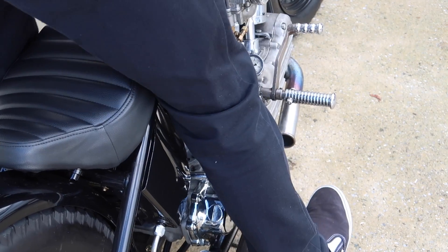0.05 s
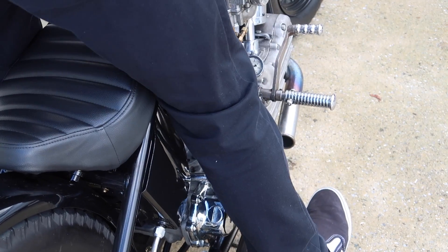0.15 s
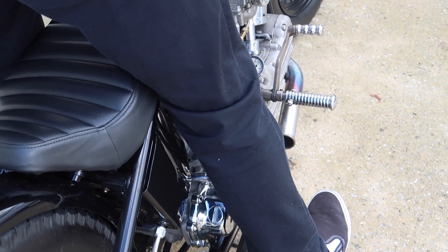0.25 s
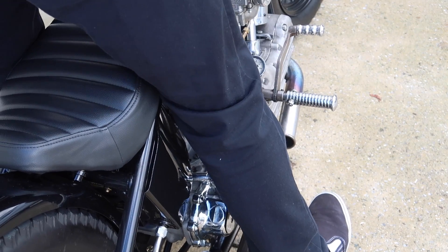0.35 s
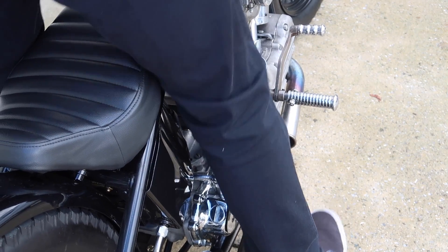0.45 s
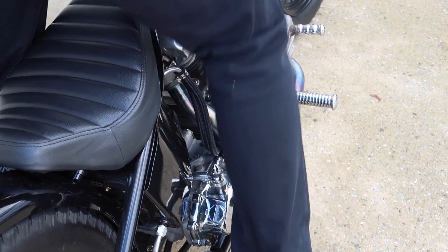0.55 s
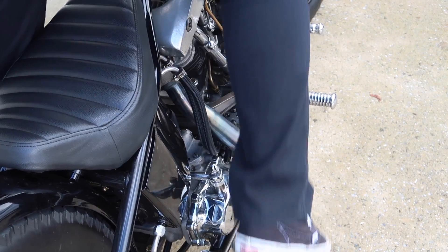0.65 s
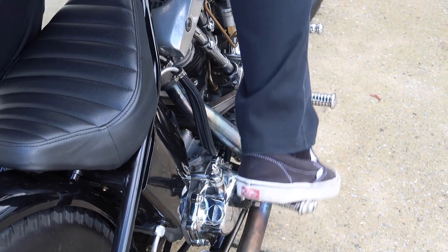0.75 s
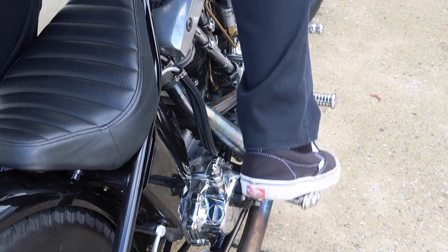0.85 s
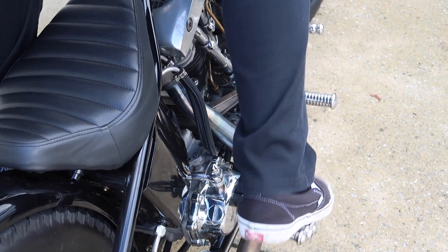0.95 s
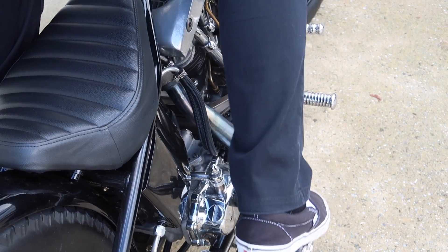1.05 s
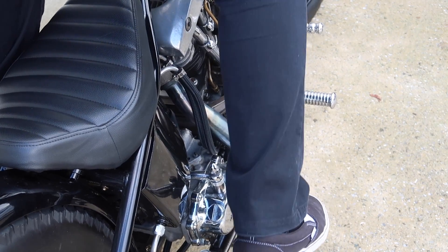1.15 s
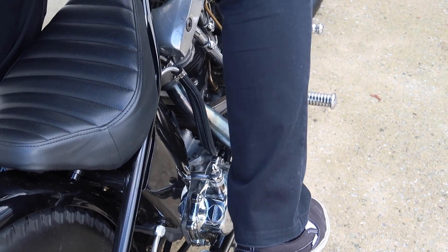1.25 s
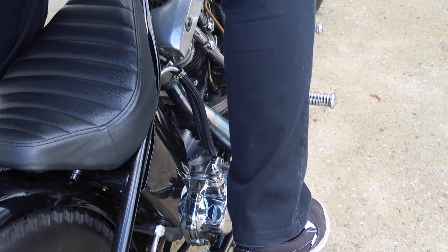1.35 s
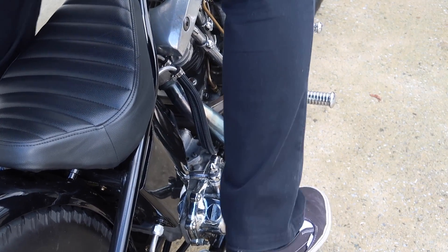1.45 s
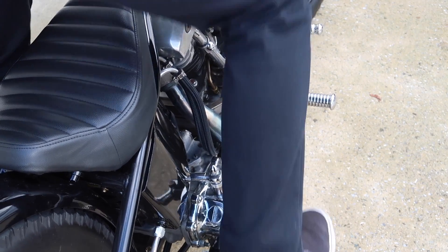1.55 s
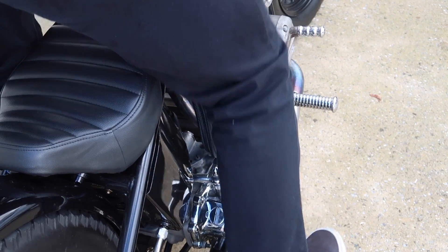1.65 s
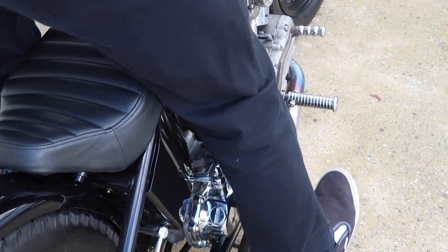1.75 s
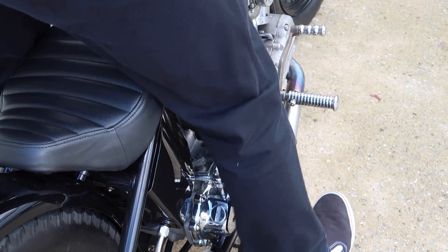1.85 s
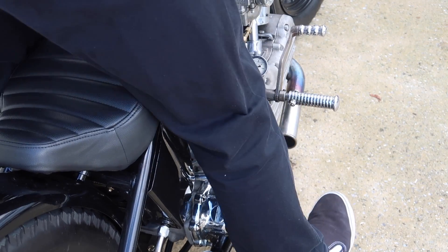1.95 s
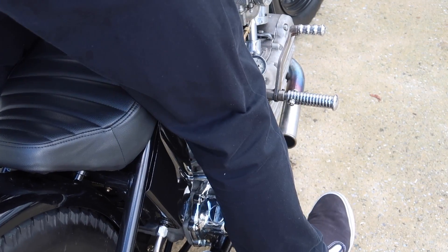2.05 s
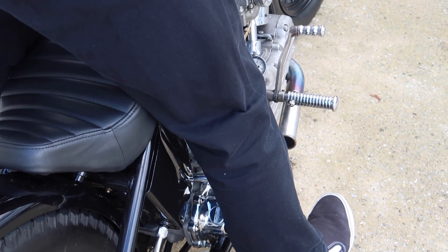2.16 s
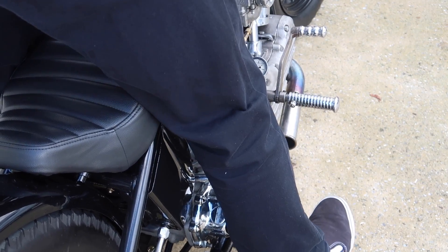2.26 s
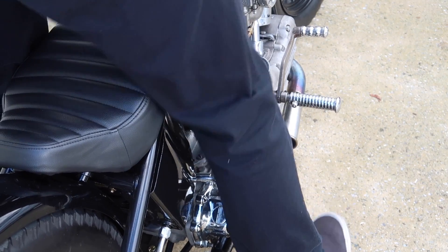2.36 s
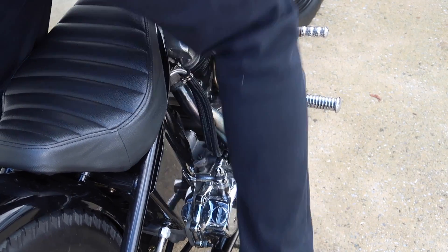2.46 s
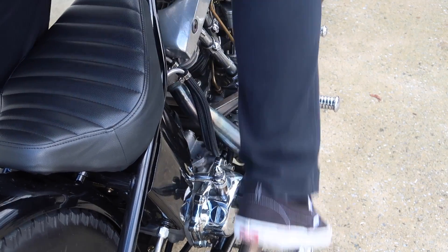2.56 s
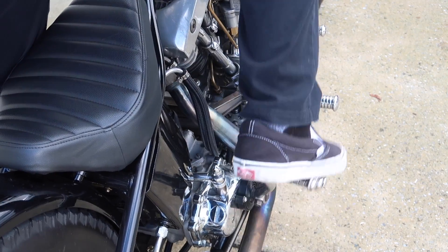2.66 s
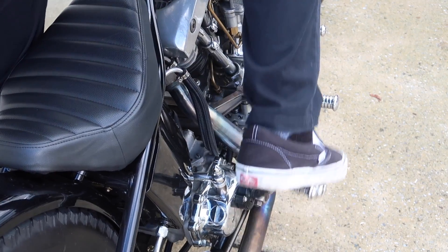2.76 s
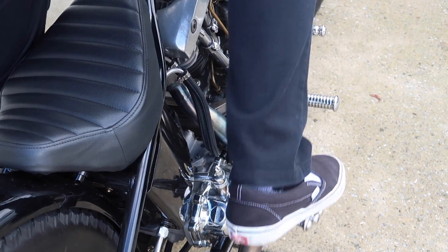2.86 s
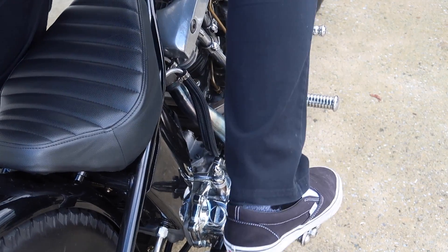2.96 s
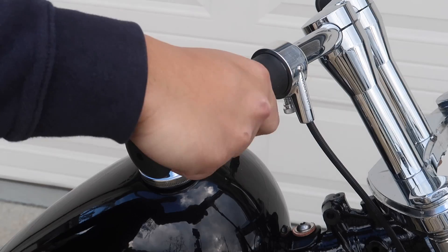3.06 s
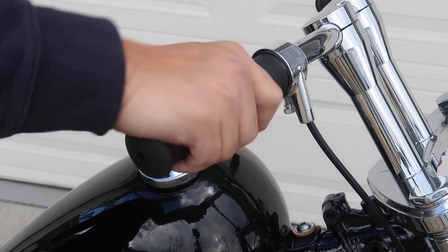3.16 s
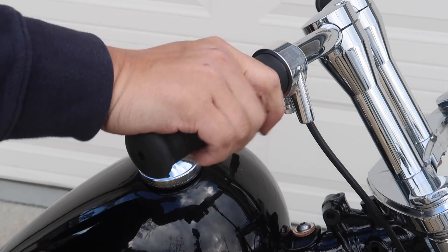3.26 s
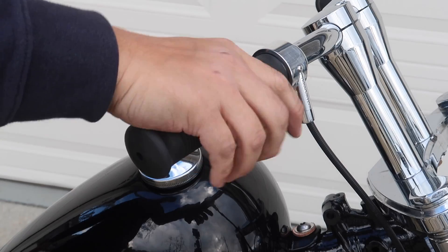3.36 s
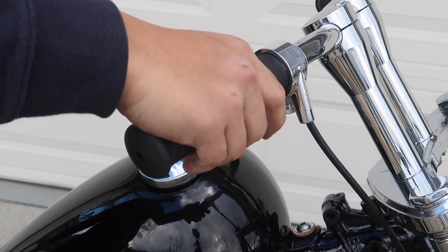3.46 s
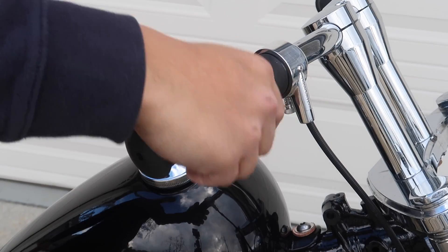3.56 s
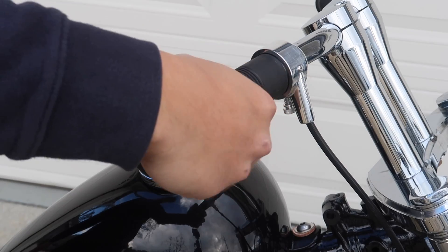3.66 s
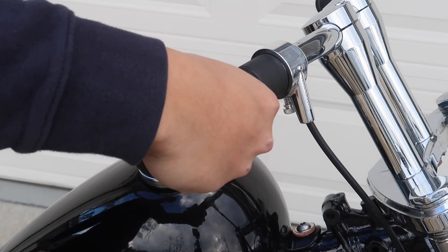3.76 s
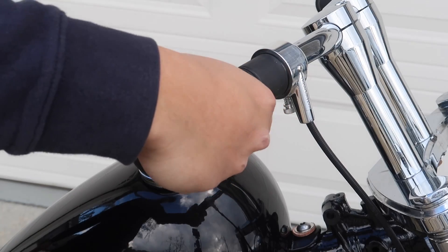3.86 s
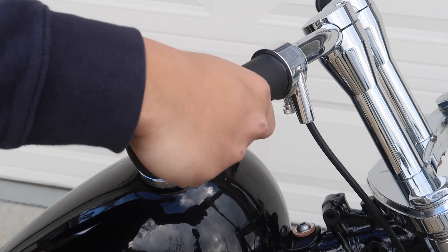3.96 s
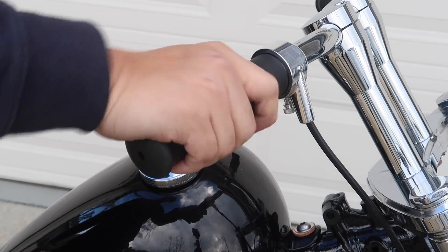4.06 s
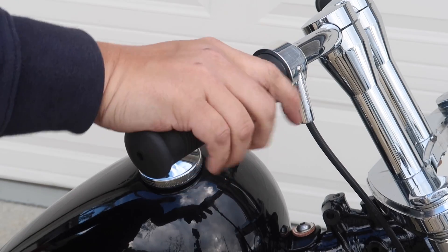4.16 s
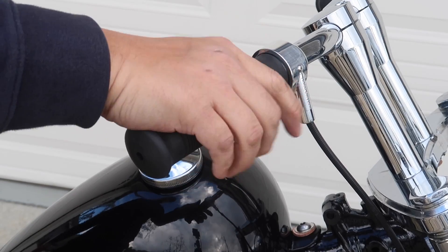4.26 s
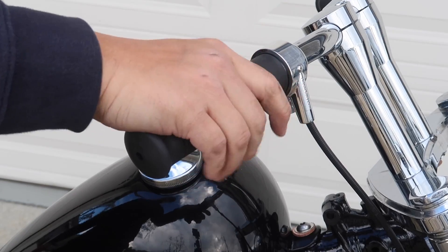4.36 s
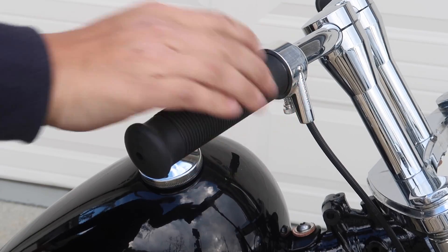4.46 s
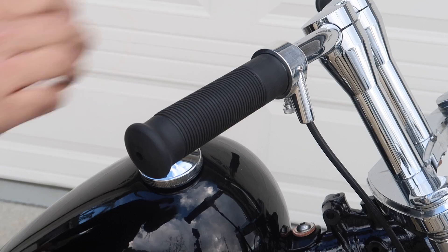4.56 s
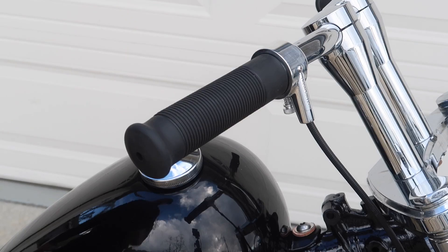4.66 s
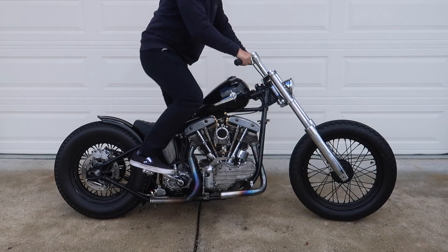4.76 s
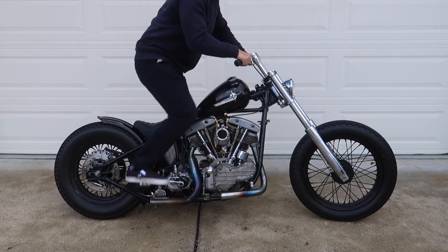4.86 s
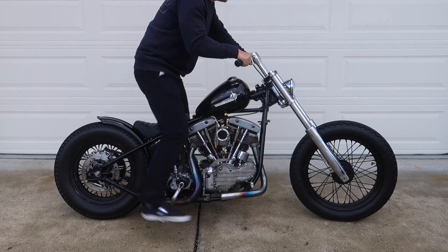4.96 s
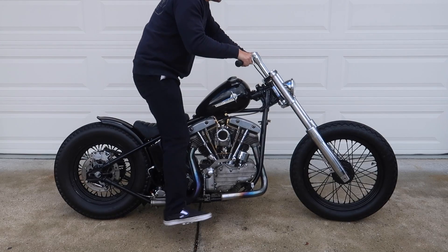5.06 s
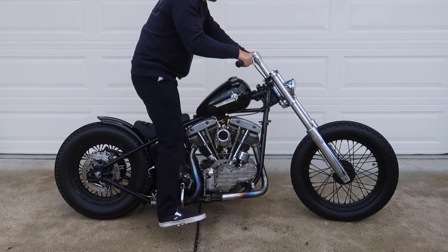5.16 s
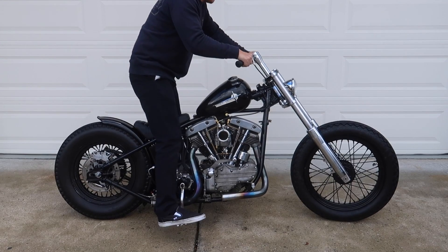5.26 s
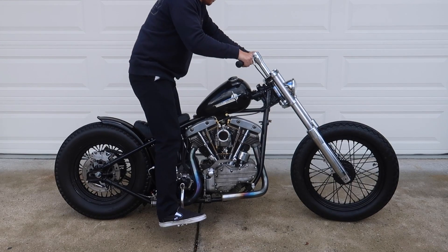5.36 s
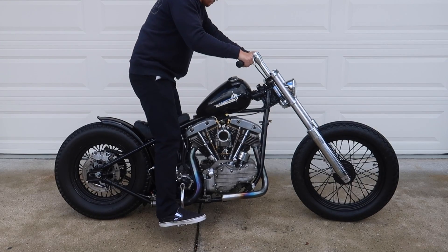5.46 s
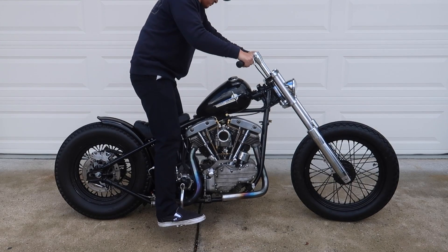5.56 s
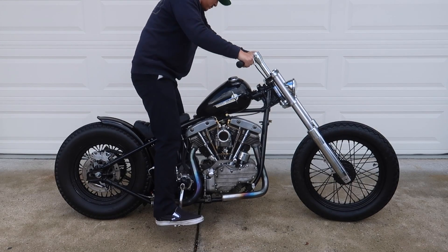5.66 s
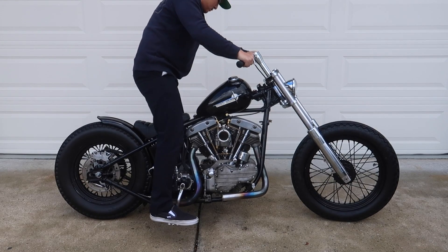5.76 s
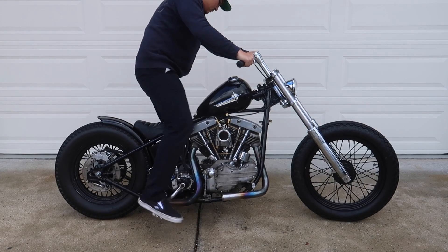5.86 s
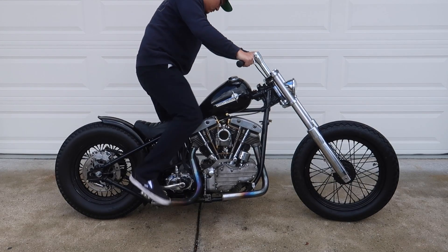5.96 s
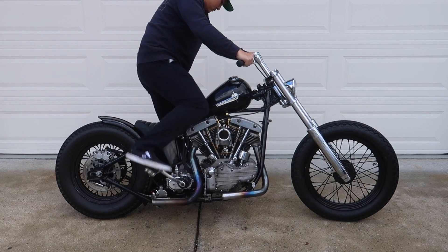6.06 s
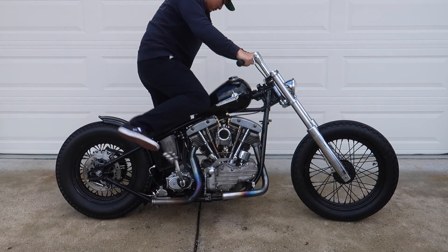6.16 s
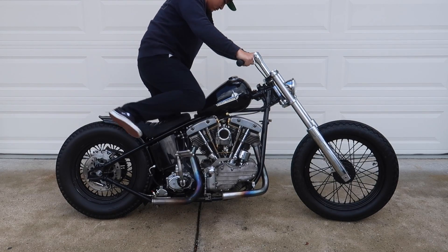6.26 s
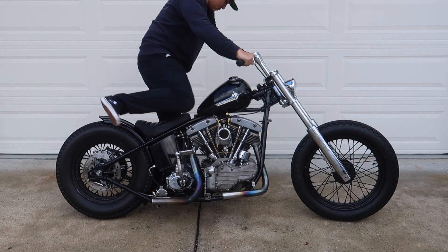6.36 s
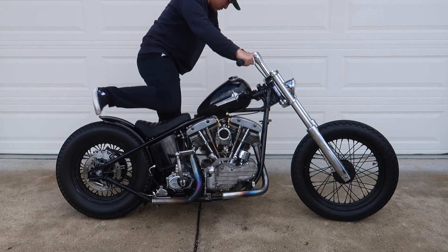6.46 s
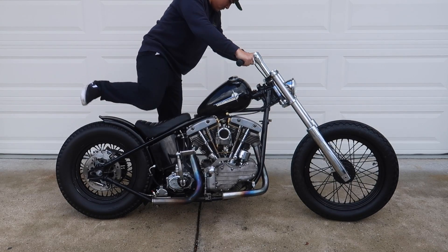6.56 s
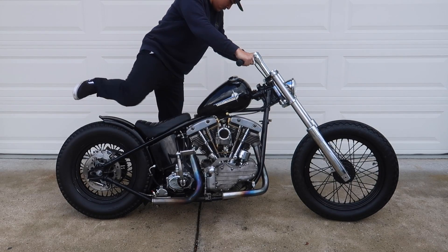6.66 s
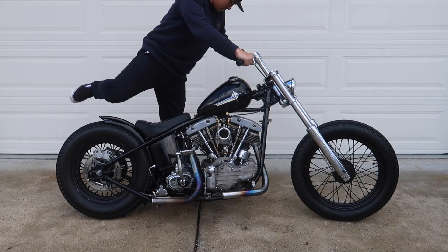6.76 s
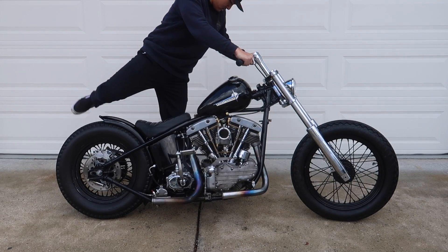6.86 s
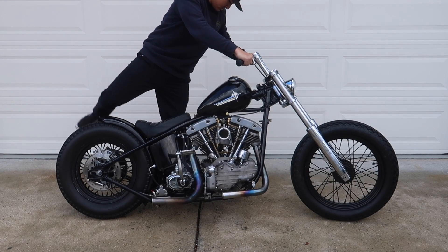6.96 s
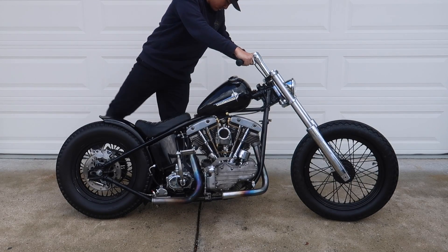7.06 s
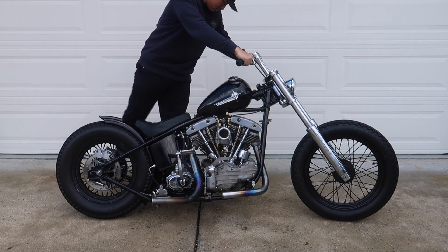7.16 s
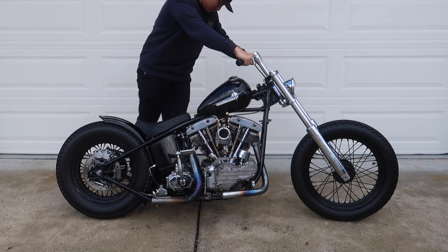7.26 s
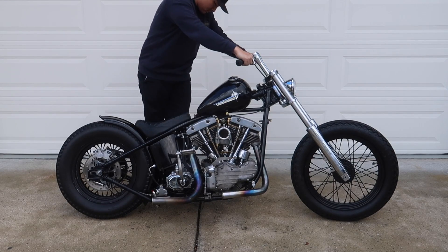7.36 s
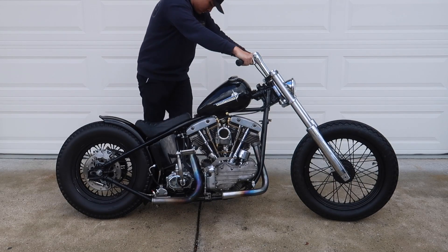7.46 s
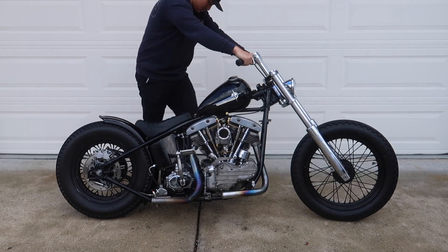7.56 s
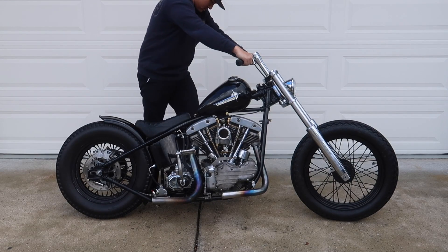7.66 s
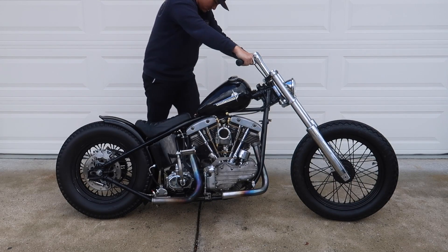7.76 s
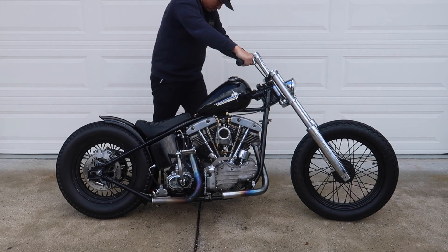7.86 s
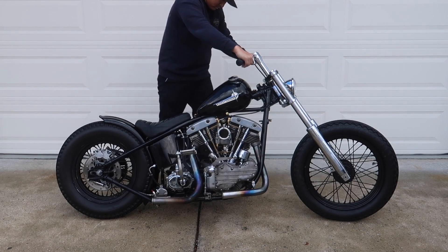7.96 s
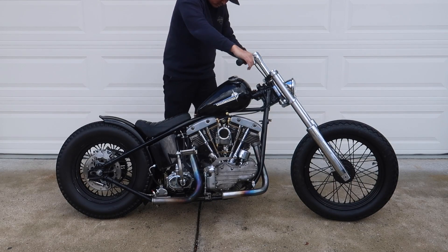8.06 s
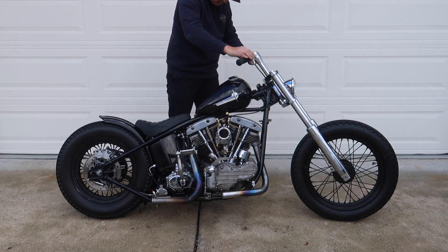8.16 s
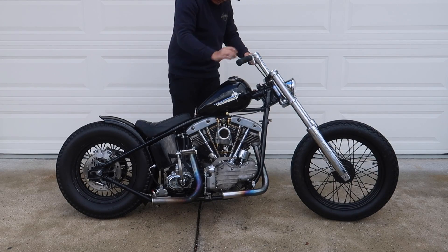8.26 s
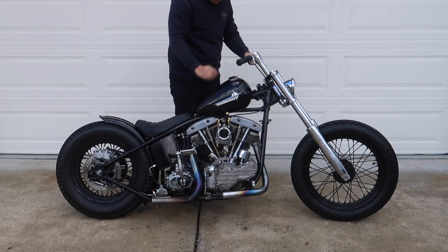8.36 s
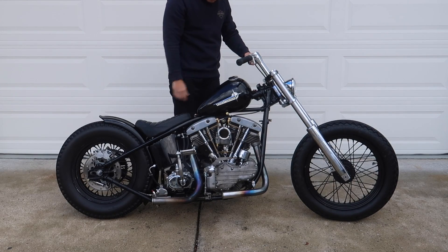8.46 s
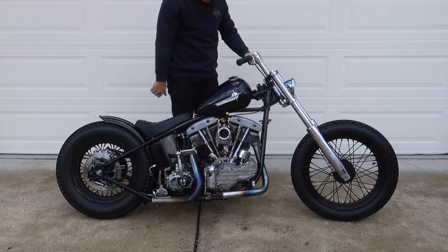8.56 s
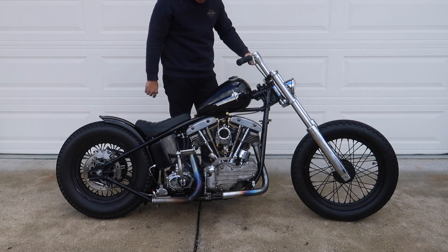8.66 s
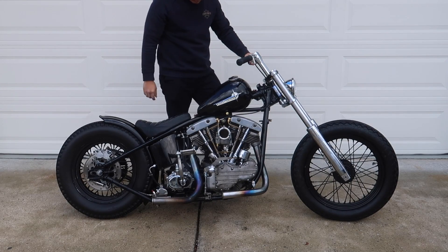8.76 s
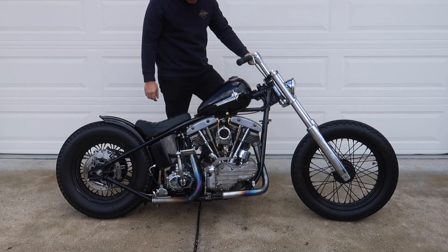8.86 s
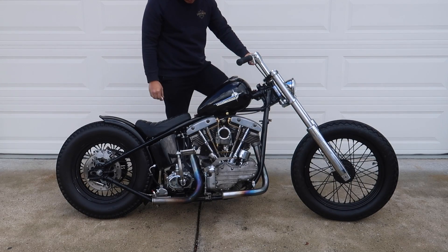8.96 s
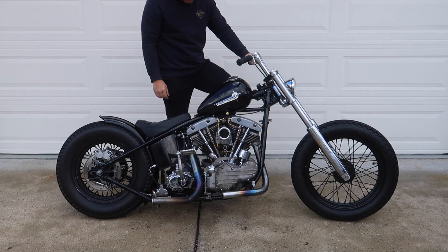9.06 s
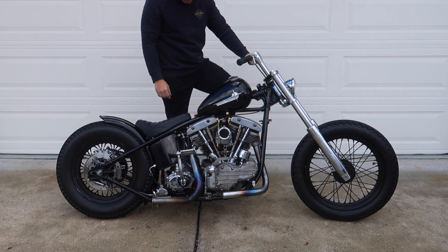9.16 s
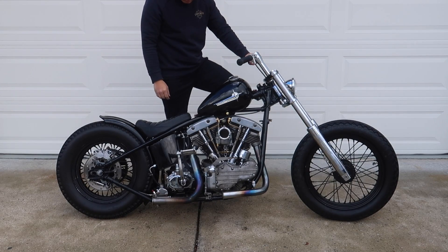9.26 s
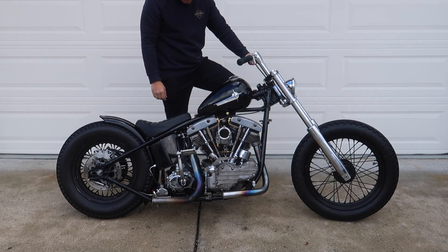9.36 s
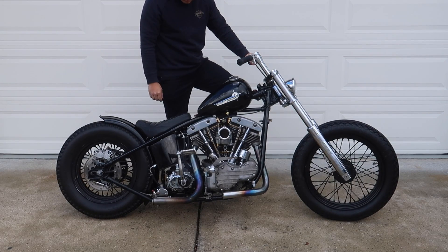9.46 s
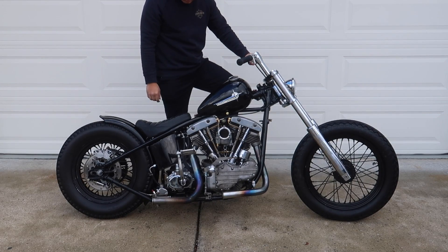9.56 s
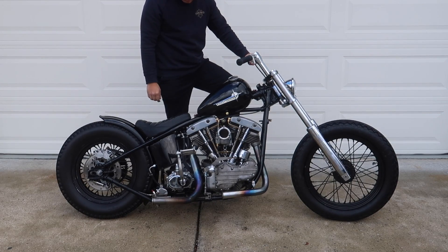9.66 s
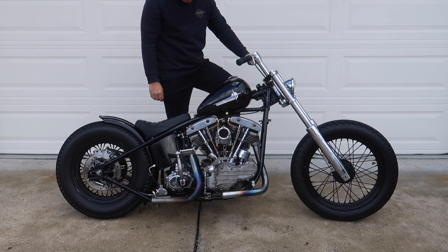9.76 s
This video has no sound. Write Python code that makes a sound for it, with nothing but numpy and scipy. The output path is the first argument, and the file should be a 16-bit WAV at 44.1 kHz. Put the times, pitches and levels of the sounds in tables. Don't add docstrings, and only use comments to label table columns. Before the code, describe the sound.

Kick lever of a motorcycle ratchets twice close up, a hand grip snaps twice, then a third kick catches into an uneven two-cylinder idle.

```python
import sys
import numpy as np
from scipy import signal
from scipy.fft import rfft, irfft, next_fast_len
from scipy.io import wavfile
from scipy.ndimage import uniform_filter1d

SR = 44100
rng = np.random.default_rng(int(sys.argv[2]) if len(sys.argv) > 2 else 0)


def store_wav(level_fs):
    pcm = np.round(np.clip(np.atleast_2d(level_fs), -1, 1) * 32767)
    wavfile.write(sys.argv[1], SR, pcm.T.astype(np.int16))


def how_loud(loudness_db):
    steps = np.asarray(loudness_db, float) / 20
    return 10 ** steps


N = 433062
T = np.arange(N) / SR
QUIET = int(5.5 * SR)

# f/Hz, level/dB
BASS_HALF = [(1200, 0), (3000, -30)]
TREBLE_HALF = [(700, -30), (2200, 0)]
# f/Hz, width/Hz, level/dB
LEVER_MODES = [(560, 50, -8), (870, 25, 1), (1010, 40, -5), (1112, 13, 6), (1720, 40, -8), (2020, 25, -4),
               (2290, 35, -4), (2650, 40, -4), (3150, 30, -2), (4030, 80, -11), (4390, 30, -6),
               (5140, 40, -12)]
# f/Hz, width/Hz, level/dB
GEAR_MODES = [(732, 29, 0), (856, 20, -1), (1110, 21, -4), (1320, 33, -7), (1480, 32, -8), (2420, 120, -15),
              (3790, 62, -13), (4910, 61, -13), (5650, 52, -18), (6420, 41, -20), (7200, 60, -22),
              (8300, 70, -25)]
# f/Hz, width/Hz, level/dB
SPRING_MODES = [(1660, 46, -2), (2480, 43, 0), (3080, 180, -3), (3860, 83, -2), (4470, 35, 2),
                (4720, 40, -3)]


def noise():
    return rng.standard_normal(N)


def level(x, db):
    return x * how_loud(db) / np.sqrt(np.mean(x ** 2))


def colour(x, table):
    size = next_fast_len(len(x), True)
    hz, db = np.transpose(table)
    bins = np.arange(size // 2 + 1) * SR / size
    gain = how_loud(np.interp(np.log(bins + 1), np.log(hz), db))
    return irfft(rfft(x, size) * gain, size)[:len(x)]


def ring(x, modes):
    out = 0
    for hz, width, db in modes:
        out = out + how_loud(db) * signal.lfilter(*signal.iirpeak(hz, hz / width, SR), x)
    return out


def curve(spans, column):
    out = np.zeros(N)
    for rows in spans:
        rows = np.array(rows)
        inside = (T >= rows[0, 0]) & (T <= rows[-1, 0])
        out[inside] = how_loud(np.interp(T[inside], rows[:, 0], rows[:, column]))
    return uniform_filter1d(out, size=180)


def swells(rows):
    out = 0
    for s, db, rise, hold, fall in rows:
        ramp = np.minimum((T - s) / rise, (s + hold - T) / fall)
        out = out + how_loud(db + 20 * np.minimum(0, ramp))
    return out


def strike(times, dbs, shape, speeds=None):
    out = np.zeros(N + len(shape))
    k = np.arange(len(shape))
    if speeds is None:
        speeds = np.ones(len(times))
    for s, db, speed in zip(times, dbs, speeds):
        i = int(s * SR)
        out[i:i + len(shape)] += how_loud(db) * np.interp(k * speed, k, shape)
    return out[:N]


def fades(times, dbs, t60s):
    out = np.zeros(N)
    for s, db, t60 in zip(times, dbs, t60s):
        i = int(s * SR)
        out[i:i + SR // 2] += how_loud(db - 60 * T[:SR // 2] / max(t60, 1 / 300))
    return out


def walk(rate):
    held = rng.standard_normal(size=8000)[(T * min(rate, 800)).astype(int)]
    return 1.2 * uniform_filter1d(held, int(SR / rate))


def town():
    # f/Hz, level/dB
    traffic = [(18, -14), (30, -3), (60, -1), (90, 0), (160, -7), (310, -12), (630, -18), (1000, -22),
               (2500, -27), (4000, -33), (8000, -41), (13000, -51), (16000, -66)]
    # from t/s, rumble level/dB, hiss above it/dB
    places = [
        (0, -48, -.6),
        (2.8, -44.5, -4.1),
        (3.07, -43.5, -6.3),
        (3.5, -48.5, -1.3),
        (4.0, -43.5, -6.3),
        (4.87, -47.5, 1.2),
    ]
    # t/s, level/dB, rise/s, hold/s, fall/s
    rustle = [
        (.9, -.6, .5, .02, .25),
        (2.8, -6, .4, .24, .02),
    ]
    s, rumble_db, hiss_db = np.transpose(places)
    place = np.searchsorted(s, T, side="right").clip(1) - 1
    bed = level(colour(noise(), traffic), 0)
    rumble = signal.sosfiltfilt(signal.butter(2, 200, fs=SR, output="sos"), bed)
    hiss = (bed - rumble) * (how_loud(hiss_db[place]) + swells(rustle)) * how_loud(1.5 * walk(12))
    return (hiss + rumble * how_loud(3.0 * walk(7))) * how_loud(rumble_db[place])


def cranking():
    # t/s, hold/s, level/dB, from f/Hz, to f/Hz
    pump = [
        (0.001, .13, -38, 69, 70),
        (1.8, .155, -29, 68, 82),
        (5.047, .083, -14, 68, 90),
        (5.188, .06, -10.5, 78, 88),
    ]
    # t/s, f/Hz, level/dB
    whine = [(2.22, 5400, -75), (2.25, 5150, -57), (2.29, 4750, -57), (2.32, 4500, -75)]
    # t/s, effort level/dB
    effort = [
        [(0.0, -36), (0.018, -37), (0.026, -25), (0.04, -29), (0.068, -16), (0.104, -26), (0.226, -45),
         (0.384, -58), (0.46, -56)],
        [(1.54, -62), (1.632, -36), (1.73, -34), (1.764, -25), (1.822, -25), (1.878, -24), (1.96, -31),
         (2.002, -45), (2.36, -58)],
        [(4.86, -63), (4.874, -47), (4.96, -47), (4.982, -34), (5.084, -25), (5.146, -34), (5.2, -24),
         (5.264, -34), (5.32, -30)],
    ]
    # t/s, level/dB, rise/s, hold/s, fall/s
    gulps = [
        (.04, -33.5, .25, .03, .17),
        (1.74, -39, .12, .14, .07),
        (2.06, -46.5, .14, .05, .27),
        (4.874, -58, .02, .09, .05),
        (4.982, -31.5, .015, .06, .06),
        (5.078, -28, .06, .012, .045),
        (5.194, -22, .025, .006, .028),
        (5.318, -20.5, .015, .002, .004),
    ]
    # f/Hz, level/dB
    near_bed = [(71, -38), (120, -8), (141, -11), (488, -5), (552, -8), (863, -2), (1220, -14), (2440, -16),
                (7760, -33), (15500, -52)]
    # f/Hz, level/dB
    far_bed = [(88, -32), (150, -2), (290, -10), (352, -6), (751, -11), (1350, -9), (1700, -14),
               (2300, -11), (3200, -20), (4240, -15), (4740, -17), (6000, -24), (13300, -36), (15500, -49)]
    pump_rise_s, pump_fall_s = .015, .032
    out = 0
    for s, hold, db, from_hz, to_hz in pump:
        hz = from_hz + (to_hz - from_hz) * np.clip((T - s) / hold, 0, 1.6) ** 2
        phase = 2 * np.pi * np.cumsum(hz) / SR
        phase = phase - phase[int(s * SR)] + np.pi / 2
        hum = np.sin(phase) + .1 * np.sin(2 * phase)
        out = out + np.sqrt(2) * swells([(s, db, pump_rise_s, hold, pump_fall_s)]) * hum
    s, hz, db = np.transpose(whine)
    leak = np.sin(2 * np.pi * np.cumsum(np.interp(T, s, hz)) / SR)
    out = (out + curve([whine], column=2) * leak)[:QUIET]
    halves = ((BASS_HALF, curve(effort, column=1), .3, 2.0),
              (TREBLE_HALF, swells(gulps), 4.5, 3.5))
    for half, gain, near_db, far_db in halves:
        grind = (noise() * how_loud(2.0 * walk(120)))[:QUIET]
        near = level(colour(grind, near_bed), 0) + level(ring(grind, GEAR_MODES), -4.5)
        near = level(colour(near, half), near_db)
        far = level(colour(grind, far_bed), 0) + level(ring(grind, SPRING_MODES), -12)
        far = level(colour(far, half), far_db)
        out = out + np.where(T[:QUIET] < 3, near, far) * gain[:QUIET]
    return out


def boot():
    # t/s, level/dB, t60/s
    thuds = [
        (.06, -22, .12),
        (.535, -19, .12),
        (.985, -27, .2),
        (2.055, -33, .12),
        (2.858, -30, .2),
        (3.383, -25, .07),
        (4.249, -25, .07),
        (5.186, -13, .1),
        (4.08, -36, .15),
    ]
    # f/Hz, level/dB
    sole = [(40, -20), (120, -3), (300, 0), (600, -7), (1500, -19), (3000, -30), (6000, -60), (16000, -90)]
    blows = uniform_filter1d(fades(*np.transpose(thuds)), size=200)
    return level(colour(noise()[:QUIET], sole), 0) * blows[:QUIET]


def ratchet():
    # t/s, peak level/dB
    knocks = [(0.471, -14), (0.499, -17), (0.547, -2), (0.586, -4), (0.618, -4), (0.648, -5), (0.679, -5),
              (0.712, -4), (0.75, -4), (0.8, -3), (0.925, -29), (0.955, -15), (0.983, -15), (1.159, -38),
              (1.588, -35), (1.631, -28), (1.736, -20), (1.763, -10), (1.781, -12), (1.853, -13),
              (1.879, -12), (1.911, -14), (1.956, -20), (2.055, -26), (2.423, -14), (2.458, -2.5),
              (2.493, -4), (2.524, -7), (2.548, -6), (2.574, -4), (2.602, -6), (2.635, -4), (2.675, -4),
              (2.72, -4), (2.858, -15)]
    # f/Hz, level/dB
    knock_bed = [(71, -55), (120, -25), (169, -18), (557, -12), (668, -10), (1090, 0), (1360, -12),
                 (4460, -17), (9050, -40), (15000, -62)]
    # f/Hz, level/dB
    close_by = [(100, -2), (300, 0), (800, 0), (1100, -4), (1500, 4), (3000, 0), (6000, -3), (9000, -3),
                (11000, -10), (14000, -20)]
    bass_t60_s, treble_t60_s, yard_t60_s = .11, .1, .5
    s, db = np.transpose(knocks)
    treble_db = db + .7 * np.minimum(db + 6, 1)
    out = 0
    for half, dbs, t60 in ((BASS_HALF, db, bass_t60_s), (TREBLE_HALF, treble_db, treble_t60_s)):
        direct = uniform_filter1d(fades(s, dbs, 0 * s + t60), size=90, origin=24)
        yard = fades(s, dbs - 31, 0 * s + yard_t60_s)
        blows = noise() * how_loud(1.5 * walk(350)) * (direct + yard)
        out = out + colour(blows[:QUIET], half)
    return colour(how_loud(6.0) * colour(out, knock_bed) + how_loud(3.0) * ring(out, LEVER_MODES), close_by)


def grip():
    # t/s, peak level/dB, t60/s
    ticks = [(3.168, -38, .02), (3.318, -29, .01), (3.3777, -19, .03), (3.3826, 4, .011), (3.717, -38, .02),
             (4.049, -39, .03), (4.078, -39, .02), (4.105, -39, .02), (4.122, -19, .005), (4.245, -22, .02),
             (4.249, 4, .011), (4.873, -32, .02)]
    # f/Hz, width/Hz, level/dB
    bar_modes = [(877, 90, -8), (1600, 320, 0), (2000, 250, -4), (2510, 250, -6), (3220, 250, -8)]
    # f/Hz, level/dB
    tick_bed = [(120, -48), (200, -20), (560, -21), (858, -11), (1190, -14), (1590, -3), (3300, -10),
                (9660, -38), (11800, -31), (15500, -46)]
    # t/s, level/dB, rise/s, hold/s, fall/s
    rubs = [
        (3.215, -45, .1, .018, .035),
        (3.43, -43, .03, .002, .12),
        (3.592, -50, .04, .004, .055),
        (4.05, -51, .02, .065, .05),
        (4.12, -39, .006, .002, .04),
        (4.23, -50, .1, .002, .01),
        (4.29, -40, .03, .002, .09),
        (4.44, -50, .01, .04, .03),
    ]
    # f/Hz, level/dB
    rub_spectrum = [(180, -40), (300, -10), (723, -8), (806, -8), (884, -3), (1360, -6), (2000, -1),
                    (6180, -34), (12000, -37), (15600, -67), (22000, -120)]
    s, db, t60 = np.transpose(ticks)
    rattle = how_loud(1.6 * walk(300)) * fades(s, db - 12.5, 0 * s + .125)
    blows = (noise() * (fades(s, db + 1.5, t60) + rattle))[:QUIET]
    rub = level(colour(noise() * how_loud(3.0 * walk(200)), rub_spectrum), 3.5) * swells(rubs)
    return ring(blows, bar_modes) + how_loud(6.0) * colour(blows, tick_bed) + rub[:QUIET]


def firing():
    # t/s, speed/rpm
    crank_speed = [(5.32, 967.8), (5.48, 996.9), (5.62, 1114.5), (5.76, 976.6), (5.95, 996.3),
                   (6.1, 1029.5), (6.35, 1036.5), (6.65, 1015.5), (7, 1056.5), (7.25, 1058.2),
                   (7.55, 1093.0), (7.9, 1054.0), (8.3, 1104.4), (8.7, 1159.8), (9, 1274.9), (9.25, 1289.7),
                   (9.5, 1246.7), (9.82, 1301.0)]
    # t/s, level/dB
    charge_curve = [(5.3, -3), (5.85, -3.3), (6.2, -1.8), (7.0, -1.6), (7.5, -1.8), (7.85, -3.2),
                    (8.3, -1.5), (8.8, -1.8), (9.5, -3), (9.8, -3)]
    # t/s, pipe boom level/dB, gas spit level/dB
    odd_strokes = [(5.3188, -4.3, -12.5), (5.376, -1.1, -20.8), (5.4413, -3.2, -17.3),
                   (5.4891, -2.2, -26.0), (5.5592, -11.1, -41.0), (5.6038, -3.1, -24.6),
                   (5.6692, -3.3, -18.4), (5.7183, -2.2, -32.8), (6.1462, -2.1, -21.6),
                   (6.2632, -1.6, -19.9), (6.3786, -2.4, -16.8), (6.6128, -1.4, -19.4),
                   (6.6635, -2.2, -24.1), (6.8453, -1.5, -18.5), (6.8941, -.5, -32.1), (7.1229, -.6, -27.5),
                   (7.4617, 0.1, -25.9), (7.5239, -1.6, -17.8), (7.5722, -1.8, -23.8),
                   (7.6832, -2.1, -24.3), (7.7931, -3.2, -34.9), (8.0855, -3.7, -21.5),
                   (8.1947, -2.1, -23.8), (8.9263, -2, -20.7)]
    # t/s, level/dB
    spit_changes = [(5.79, 1.0), (5.84, -0.9), (5.91, -2.5), (5.96, -1.2), (6.03, 0.1), (6.08, 0.5),
                    (6.2, -1.9), (6.31, -0.6), (6.43, 0.7), (6.49, -4.2), (6.55, 0.4), (6.73, -1.2),
                    (6.78, 3.3), (6.96, 1.5), (7.01, -1.1), (7.08, -0.4), (7.19, -3.1), (7.24, 0.3),
                    (7.3, -2.5), (7.35, 1.1), (7.41, -2.7), (7.63, 3.2), (7.75, 1.2), (7.86, 1.4),
                    (7.91, -1.0), (7.97, -3.2), (8.13, 1.6), (8.31, -0.1), (8.35, 0.7), (8.41, 1.1),
                    (8.52, 0.7), (8.57, -3.6), (8.62, -2.0), (8.73, -4.2), (8.77, -2.6), (8.83, -2.5),
                    (8.97, -0.3), (9.02, -1.3), (9.12, -1.7), (9.16, -1.0), (9.21, -3.6), (9.3, -0.9),
                    (9.34, -2.5), (9.4, -1.5), (9.49, -2.9), (9.53, -4.5), (9.59, -1.8), (9.68, -3.0),
                    (9.72, -3.9)]
    # t/s, level/dB
    missed_thumps = [
        (8.025, 2),
        (8.245, -.5),
        (8.462, -1),
        (8.675, 3),
        (8.875, -6),
        (9.068, -2),
        (9.255, 0),
        (9.443, -3.5),
        (9.635, 2),
    ]
    first_fire_s, lean_from_s = 5.3188, 7.95
    rear_share, lean_rear_share = .431, .446
    miss_drag_s, miss_late_s = .0007, .001
    spit_db, rear_spit_db, spit_per_charge, scatter_db = -17.4, -22.6, 1.1, .3
    miss_boom_db, miss_spit_db = -8.5, -42

    rpm = np.interp(T, *np.transpose(crank_speed))
    cycles = np.cumsum(rpm * (T > first_fire_s)) / 120 / SR
    n = np.arange(int(cycles[-1]) + 1)
    front = np.interp(n + 1e-6, cycles, T)
    lean = front > lean_from_s
    miss = lean & (n % 2 == 1)
    rear_place = n + np.where(lean, lean_rear_share, rear_share)
    rear = np.interp(rear_place, cycles, T, right=T[-1]) + miss_late_s * miss
    front = front + miss_drag_s * (1. * np.roll(miss, 1) * lean - miss)
    s = np.ravel([front, rear], order="F")
    charge = np.interp(s, *np.transpose(charge_curve))
    chance = scatter_db * rng.standard_normal((len(s), 2)).T
    boom = charge + chance[0]
    spit = np.resize([spit_db, rear_spit_db], len(s)) + spit_per_charge * charge + 1.5 * chance[1]
    boom[1::2] += miss_boom_db * miss
    spit[1::2][miss] = miss_spit_db
    strokes = np.transpose([s, boom, spit])
    for row in odd_strokes:
        strokes[np.argmin(abs(s - row[0]))] = row
    for when, db in spit_changes:
        strokes[np.argmin(abs(s - when)), 2] += db
    for when, db in missed_thumps:
        strokes[np.argmin(abs(s - when)), 1] += db
    return strokes[:-1]


def cylinder(strokes, pipe, blow, jet, spit_colour):
    # f/Hz, level/dB
    churn_spectrum = [(120, -25), (190, 7), (240, 2), (290, -13), (365, -3), (410, -8), (450, -1),
                      (550, -10), (700, -8), (1000, -16), (1350, -11), (2000, -21), (5000, -40)]
    misfire_db = -37
    warm_from_s, warm_per_s = 6.9, .019
    warm_pivot_s = .016
    shut_s, shut_db_s = .047, 800
    churn_growth_db_s = .4
    hoot_hz, hoot_peak_s, hoot_width_s = 368, .0175, .008

    s, boom_db, spit_db = strokes.T
    t = T[:SR // 5]
    crack, rise, fall, lag, suction_db = blow
    warm = 1 + warm_per_s * np.maximum(s - warm_from_s, 0)
    push = np.where(t < rise, t / rise, np.exp(-(t - rise) / fall))
    modes = 0
    for hz, t60, db, sign in pipe:
        modes = modes + sign * how_loud(db - 60 * t / t60) * np.sin(2 * np.pi * hz * t)
    ringing = how_loud(-40.2) * signal.fftconvolve(push, modes)[:len(t)]
    choke = how_loud(-shut_db_s * np.maximum(t - shut_s, 0))
    pressure = np.interp(t - crack, t, ringing) * choke
    suction = np.interp(t - (crack + lag), t, ringing) * choke
    fired = spit_db > misfire_db
    opens = s + warm_pivot_s * (warm - 1)
    boom = strike(opens[fired], boom_db[fired], pressure, warm[fired])
    boom -= strike(opens, boom_db + suction_db + 4.0 * ~fired, suction, warm)

    peak, rise_db, hold, fall_db, tail_db, tail_fall_db, back_db = jet
    after = np.maximum(t - peak - hold, 0)
    tail = how_loud(-fall_db * after) + how_loud(tail_db - tail_fall_db * after)
    puff = np.where(t < peak, how_loud(-rise_db * (peak - t)), tail)
    puff = puff + how_loud(back_db) * np.exp(-((t - .025) / .007) ** 2)
    spit = level(colour(noise(), spit_colour), 0) * strike(s, spit_db + 4.0, puff) * how_loud(1.8 * walk(700))

    swirl = (t / .012) * np.exp(1 - t / .012)
    churn_gain = strike(s, boom_db + churn_growth_db_s * (s - 7), swirl)
    churn = level(colour(noise(), churn_spectrum), -23.5) * churn_gain
    hoot_wave = np.sin(2 * np.pi * hoot_hz * t) * np.exp(-((t - hoot_peak_s) / hoot_width_s) ** 2)
    return boom + spit + churn - strike(s, boom_db - 23, hoot_wave)


def exhaust():
    # t/s, pipe boom level/dB, gas spit level/dB
    catch = [
        (5.183, -15, -30),
        (5.29, -30, -33),
    ]
    pipes = {"front": [(68.5, .27, -12, -1), (96, .12, -11, -1), (139, .093, 0, 1), (345, .03, 3, 1),
             (372, .2, 4, -1)], "rear": [(61, .23, -23, -1), (114, .087, 2, 1), (151, .1, -5, -1),
             (352, .04, 12, 1), (381, .01, 17, -1)]}
    blows = {"front": (.0041, .0048, .0029, .016, 2.2), "rear": (.0017, .0048, .004, .0161, 3.8)}
    jets = {"front": (.006, 4500, .0025, 3000, -14, 520, -26),
            "rear": (.0065, 3600, .0015, 3000, -15, 600, -16)}
    # f/Hz, level/dB
    front_spit = [(300, -14), (600, -8), (1000, -13), (1400, -5), (1900, -15), (3100, 1), (3900, -15),
                  (4500, -4), (5200, -16), (6500, -14), (9500, -19), (13000, -24), (16000, -36)]
    rear_spit = [(400, -20), (1000, -19), (1400, -13), (2700, -14), (3600, 0), (4300, -11), (4700, -6),
                 (5500, -16), (7000, -19), (12500, -21), (15000, -36)]
    strokes = np.vstack([catch, firing()])
    front = cylinder(strokes[::2], pipes["front"], blows["front"], jets["front"], front_spit)
    rear = cylinder(strokes[1::2], pipes["rear"], blows["rear"], jets["rear"], rear_spit)
    return front + rear


def valve_gear():
    # f/Hz, level/dB
    clatter_spectrum = [(200, 0), (400, -4), (800, -10), (1400, -13), (2500, -16), (4500, -17), (5200, -25),
                        (9000, -35), (13000, -52), (16000, -75)]
    # t/s, level/dB
    loudness = [(5.19, -75), (5.24, -42), (5.33, -31), (5.7, -33), (5.9, -29), (6.2, -29), (6.32, -35),
                (9.8, -35)]
    # t/s, level/dB, rise/s, hold/s, fall/s
    swing = [
        (5.85, -41, .1, .12, .1),
        (6.0, -39, .05, .22, .08),
    ]
    ticks = noise() * how_loud(3.0 * walk(150) + 1.2 * walk(30))
    clatter = level(colour(ticks, clatter_spectrum), -1.2)
    clatter = clatter + level(ring(ticks, LEVER_MODES + GEAR_MODES), -12.5)
    spring = level(ring(ticks, SPRING_MODES), 0) * swells(swing)
    return clatter * how_loud(np.interp(T, *np.transpose(loudness))) + spring


def scene():
    # f/Hz, level/dB
    spread = [(150, -60), (380, -36), (1290, -26), (2380, -16), (4400, -11), (8120, -6), (15000, -3)]
    after = (0, N - QUIET)
    lever = np.pad(ratchet() + cranking() + boot(), after)
    mid = lever + np.pad(grip(), after) + exhaust() + valve_gear() + town()
    diffuse = colour(colour(mid, spread) * walk(300), [(120, -22), (400, 0)])
    leftward = .08 * colour(lever, [(80, -16), (300, 0)]) + .4 * np.gradient(lever)
    side = diffuse + leftward * (T < 3)
    return np.array([mid + side, mid - side])


def band_limit(x):
    return signal.sosfilt(signal.butter(12, 16510, fs=SR, output="sos"), x)


def record(dry):
    # f/Hz, level/dB
    capsule = [(20, -11), (45, -5), (70, 0), (15000, 0), (16000, -8), (16500, -40)]
    heard = np.array([colour(channel, capsule) for channel in dry])
    return band_limit(np.clip(heard, -1, 1))


dry = scene()
out = record(dry)
store_wav(out)
```